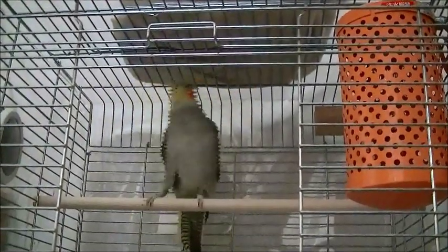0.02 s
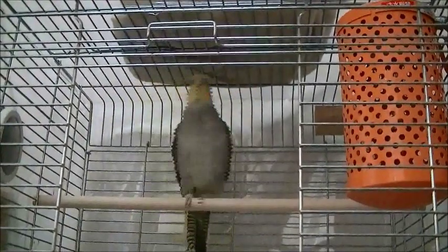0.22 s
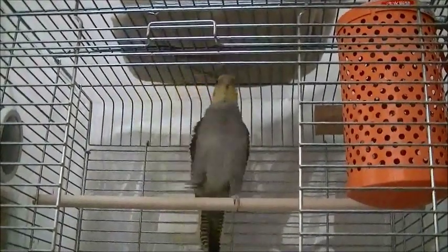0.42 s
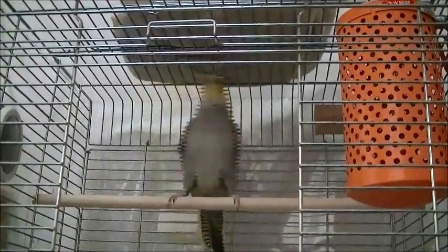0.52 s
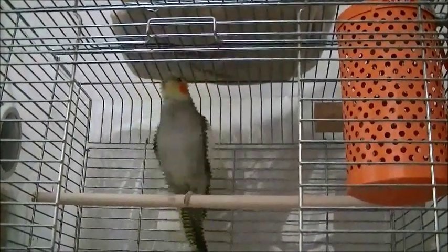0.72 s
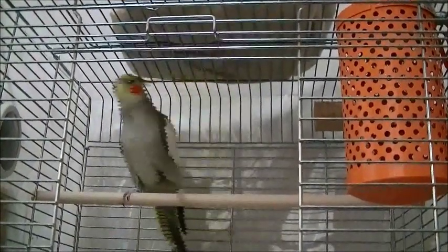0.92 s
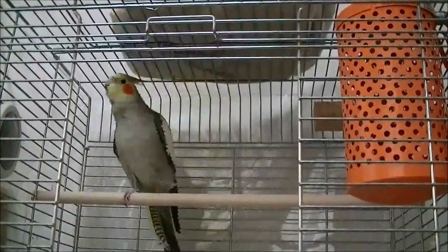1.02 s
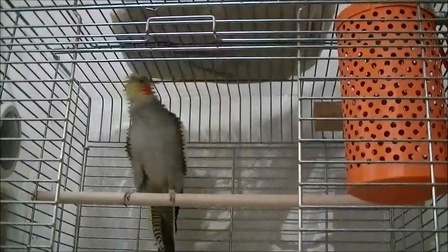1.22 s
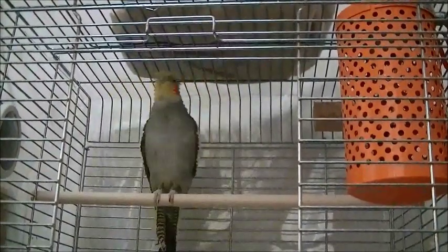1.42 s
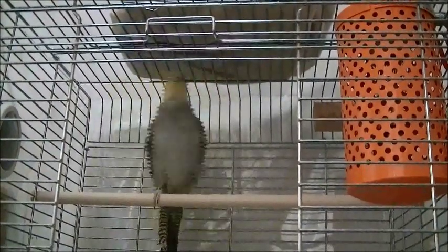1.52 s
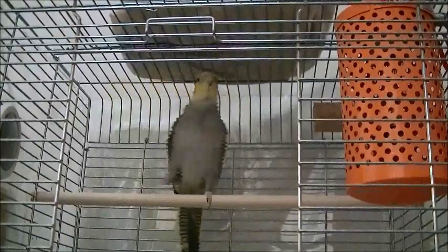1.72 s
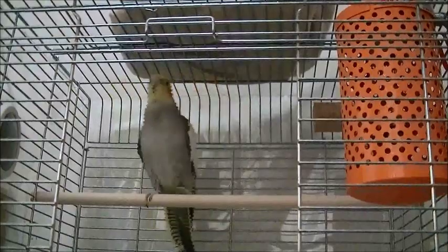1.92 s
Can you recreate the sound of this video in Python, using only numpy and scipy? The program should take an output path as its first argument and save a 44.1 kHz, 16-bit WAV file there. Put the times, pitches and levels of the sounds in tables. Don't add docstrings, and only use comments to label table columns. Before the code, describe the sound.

A cockatiel whistles in a small bare room. An earlier chirp's echo fades at the start; a quick wavering chirp at 0.2-0.37 seconds ends falling. A short chirp leaps upward at 0.6-0.7, a longer arch rises and drops sharply at 1.0-1.2, and a soft note leaps into a falling one at 1.5-1.67. Short room ringing follows each; faint low hum and hiss remain.

```python
import sys
import numpy as np
from scipy import signal
from scipy.fft import rfft, irfft
from scipy.io import wavfile
from scipy.ndimage import uniform_filter1d

SR = 44100
rng = np.random.default_rng(int(sys.argv[2]) if len(sys.argv) > 2 else 0)


def nominal_scale(level):
    x = np.asarray(level, float) / 20
    return 10 ** x


def unload_audio(sound):
    columns = np.transpose(np.atleast_2d(sound))
    steps = np.round(np.clip(columns, -1, 1) * 32767)
    wavfile.write(sys.argv[1], SR, steps.astype(np.int16))


N = 85995
LEAD = 8000

# time_s, pitch_hz, level_db
EARLY_NOTES = [
    [(-.15, 2450, -27.5), (-.11, 2585, -16.5), (-.06, 2566, -21.5), (-.05, 1986, -31.5)],
    [(.211, 2200, -41), (.22, 2420, -25.5), (.229, 2440, -19), (.245, 2400, -17.5), (.251, 2380, -18.5),
     (.256, 2200, -21.5), (.262, 2370, -24.5), (.268, 2048, -16.5)],
    [(.269, 2072, -22.5), (.277, 2440, -18), (.295, 2440, -17), (.301, 2350, -15), (.322, 2380, -18),
     (.336, 2210, -21), (.354, 2090, -24.5), (.361, 1850, -28), (.369, 1560, -45.5)],
    [(.586, 2200, -32.5), (.597, 2400, -21.5), (.61, 2440, -15), (.63, 2390, -18), (.645, 2410, -19.5),
     (.653, 2567, -26.5), (.67, 2717, -16.5), (.684, 2710, -21), (.705, 2430, -30)],
]
# time_s, pitch_hz, level_db
LATE_NOTES = [
    [(1.004, 2264, -38), (1.027, 2469, -25), (1.054, 2405, -22), (1.072, 2570, -22), (1.11, 2762, -17.5),
     (1.15, 2677, -18), (1.198, 2599, -16.5), (1.206, 2440, -24), (1.212, 1750, -35)],
    [(1.482, 2040, -40.5), (1.49, 2265, -34.5), (1.5, 2356, -22.5), (1.516, 2319, -22.5), (1.53, 2248, -33),
     (1.535, 2077, -23)],
    [(1.536, 2037, -25.5), (1.543, 2390, -16.5), (1.562, 2512, -28.5), (1.59, 2533, -20.5),
     (1.612, 2463, -20), (1.632, 2157, -22), (1.655, 2109, -25), (1.662, 1764, -36), (1.669, 1631, -47)],
]
NOTES = EARLY_NOTES + LATE_NOTES
PARTIAL_DB = [-29.5, -29.5, -37.5, -33.5, -33.5]
# frequency_hz, gain_db
BEAK_RESONANCE = [(3300, 6), (4300, 11), (4900, -1), (5500, -6.5), (7300, -5), (10000, -12.5),
                  (12500, -2.5), (15500, -7)]
SLACK_SLOPES = [0.035, 0.0013, -0.027, -0.018, -.04]
# time_s, gain_db
BEAK_OPENING = [
    (-.1, -11),
    (.22, -3.5),
    (.35, 4),
    (.6, -3),
    (0.699, -3.5),
    (1.021, -5.5),
    (1.201, -1),
    (1.5, 1.5),
    (1.65, 0),
]
# time_s, gain_db
THROAT = [
    (.23, 1.5),
    (0.299, -7),
    (.345, -0.5),
    (0.609, 0.5),
    (0.701, 1.5),
    (1.101, 1.5),
    (1.211, 0.5),
    (1.52, 2.5),
    (1.57, -4),
    (1.66, -0.5),
]
# time_s, level_db
VOICE_CATCHES = [
    (0.217, -61.5),
    (.61, -69),
    (1.018, -61),
]
# frequency_hz, t60_s
DECAY_TIMES = [(1500, .25), (2500, 0.24), (4500, .18), (8000, .15), (13000, 0.058)]
# frequency_hz, gain_db
ECHO_COLOUR = [(1500, -4), (2500, -2), (3500, 2), (5000, -0.5), (8000, 3.5), (14000, 6.5)]
# frequency_hz, density_db_per_hz
HISS_SPECTRUM = [(24, -56), (40, -15), (247, -4), (1450, -20), (1730, -18), (2330, -16.5), (4350, -27.5),
                 (14000, -34.5), (15500, -48)]
# centre_hz, width_hz, level_db
HUM_BANDS = [(79, 8.9, -74), (196, 45, -61), (260, 30, -68.5), (747, 27, -76), (4710, 500, -71.5)]
# time_s, gain_db
APPLIANCE_LOAD = [
    (0.021, 1),
    (0.301, -0.5),
    (0.551, 0.5),
    (0.871, 1),
    (1.3, -2),
    (1.62, -1),
    (1.72, 5.5),
    (1.93, 0.5),
]

EDGE_S = 0.0025
WOBBLE_HZ, WOBBLE_RATE_HZ = 10.7, 66
FLUTTER_DB, ROUGHNESS, ROUGH_RATE_HZ = 4, 0.19, 150
EFFORT_SHARE = 0.1
SLACK_BELOW_HZ = 2077
CATCH_S = 0.0081
BREATH_DB = -54
BIRD_DB, PAN_DB = 3.8, 0.36
ROOM_DB, ROOM_SIDE_DB, ROOM_GAP_S = -2.5, -16.5, 0.0033
FLOOR_DB, FLOOR_SIDE_DB = -58.5, -19.5
MOTOR_HZ, MOTOR_DB = 81.5, -72
LIMIT_DB, GRIP_S, RECOVER_DB_PER_S = -11.3, 0.0008, 86


def rms_one(x):
    return x / np.sqrt(np.mean(x ** 2) + 1e-20)


def at_hz(points, hz):
    p = np.array(points)
    return np.interp(np.log(np.maximum(hz, 1)), np.log(p[:, 0]), p[:, 1])


def at_time(points, t, column=1):
    p = np.array(points)
    return np.interp(t, p[:, 0], p[:, column])


def drift(rate_hz):
    r = np.exp(-2 * np.pi * rate_hz / SR)
    white = rng.standard_normal(N + 2 * LEAD)
    return rms_one(signal.lfilter([1], [1, -2 * r, r * r], white)[LEAD:])


def stereo(mid, side):
    return mid + side * np.array([[1], [-1]])


def overtones(t, hz, db, phase):
    bright_db = at_time(BEAK_OPENING, t)
    octave_db = at_time(THROAT, t)
    slack_hz = np.maximum(SLACK_BELOW_HZ - hz, 0)
    total = 0
    for k, level_db, slope in zip(range(2, 7), PARTIAL_DB, SLACK_SLOPES):
        gain_db = level_db + at_hz(BEAK_RESONANCE, k * hz)
        gain_db = gain_db + EFFORT_SHARE * (db + 26) + FLUTTER_DB * drift(40)
        gain_db = gain_db + slope * slack_hz + (octave_db if k == 2 else bright_db)
        rough = 1 + ROUGHNESS * drift(ROUGH_RATE_HZ * k / 2)
        total = total + nominal_scale(gain_db) * rough * np.sin(k * phase)
    return total


def voice_catches(t, phase):
    catch = sum(nominal_scale(level_db) * np.exp(-.5 * ((t - s) / CATCH_S) ** 2) for s, level_db in VOICE_CATCHES)
    return catch * (np.sin(0.5 * phase) + np.sin(1.5 * phase))


def whistle():
    t = (np.arange(N + LEAD) - LEAD) / SR
    rows = np.concatenate(NOTES)
    rows = rows[np.argsort(rows[:, 0])]
    hz = uniform_filter1d(at_time(rows, t), size=91) + WOBBLE_HZ * drift(WOBBLE_RATE_HZ)
    db = uniform_filter1d(at_time(rows, t, 2), size=91)
    on = 0
    for note in NOTES:
        fade_in = np.clip((t - note[0][0]) / EDGE_S + .5, 0, 1)
        fade_out = np.clip((note[-1][0] - t) / EDGE_S + .5, 0, 1)
        on = on + fade_in * fade_out
    phase = 2 * np.pi * np.cumsum(hz) / SR
    tone = np.sin(phase) * (1 + nominal_scale(BREATH_DB) * 10 * drift(620))
    tone = tone + overtones(t, hz, db, phase)
    return np.sqrt(2) * np.minimum(on, 1) * (nominal_scale(db) * tone + voice_catches(t, phase))


def room(x):
    t = np.arange(SR // 2) / SR
    edges_hz = 700 * 2 ** np.arange(0, 5, .5)
    white = rng.standard_normal((2, 2, len(t)))
    echo = 0
    for k, (low, high) in enumerate(zip(edges_hz, edges_hz[1:])):
        bandpass = signal.butter(2, [low, high], "band", fs=SR, output="sos")
        band = signal.sosfilt(bandpass, white[k % 2])
        centre_hz = np.sqrt(low * high)
        t60 = at_hz(DECAY_TIMES, centre_hz)
        decay = nominal_scale(at_hz(ECHO_COLOUR, centre_hz) - 60 * t / t60)
        echo = echo + band * decay / np.sqrt(t60 * SR / (2 * np.log(1000)))
    echo = echo * np.clip(t / ROOM_GAP_S - 1, 0, 1)
    mid, side = signal.fftconvolve(x[None], echo, axes=1)[:, :len(x)]
    return nominal_scale(ROOM_DB) * stereo(mid, nominal_scale(ROOM_SIDE_DB) * side)


def shaped_noise(power):
    white = rfft(rng.standard_normal((2, N)))
    return irfft(white * np.sqrt(power * N / 2), N)


def hiss(hz):
    power = nominal_scale(2 * at_hz(HISS_SPECTRUM, hz))
    power = power / (1 + nominal_scale(1.5 * (54 - hz))) / (1 + nominal_scale(.03 * (hz - 14603.5)))
    return shaped_noise(power / power.sum() * nominal_scale(2 * FLOOR_DB))


def appliance_hum(hz, t):
    power = 0
    for centre_hz, width_hz, level_db in HUM_BANDS:
        hump = np.exp(-2 * ((hz - centre_hz) / width_hz) ** 2)
        power = power + hump / hump.sum() * nominal_scale(2 * level_db)
    return shaped_noise(power) * nominal_scale(at_time(APPLIANCE_LOAD, t))


def background():
    hz = np.arange(N // 2 + 1) * SR / N
    t = np.arange(N) / SR
    mid, side = hiss(hz) + appliance_hum(hz, t)
    motor = np.sqrt(2) * nominal_scale(MOTOR_DB) * np.sin(2 * np.pi * MOTOR_HZ * t)
    return stereo(mid + motor, nominal_scale(FLOOR_SIDE_DB) * side)


def scene():
    bird = nominal_scale(BIRD_DB) * whistle()
    pan = nominal_scale(np.array([[PAN_DB], [-PAN_DB]]))
    return ((bird + room(bird)) * pan)[:, LEAD:] + background()


def low_pass(x):
    return signal.sosfilt(signal.butter(12, 15750, fs=SR, output="sos"), x)


def record(dry):
    ramp = RECOVER_DB_PER_S * np.arange(N) / SR
    level = 20 * np.log10(np.abs(dry).max(axis=0) + 1e-6)
    held = np.maximum.accumulate(level + ramp) - ramp
    r = np.exp(-1 / (GRIP_S * SR))
    cut_db = signal.lfilter([1 - r], [1, -r], np.maximum(held - LIMIT_DB, 0))
    mix = dry * nominal_scale(-cut_db)
    return low_pass(mix)


dry = scene()
out = record(dry)
unload_audio(out)
```